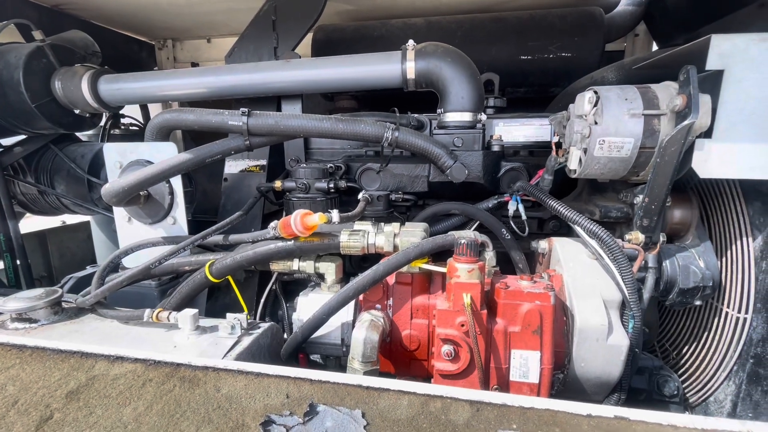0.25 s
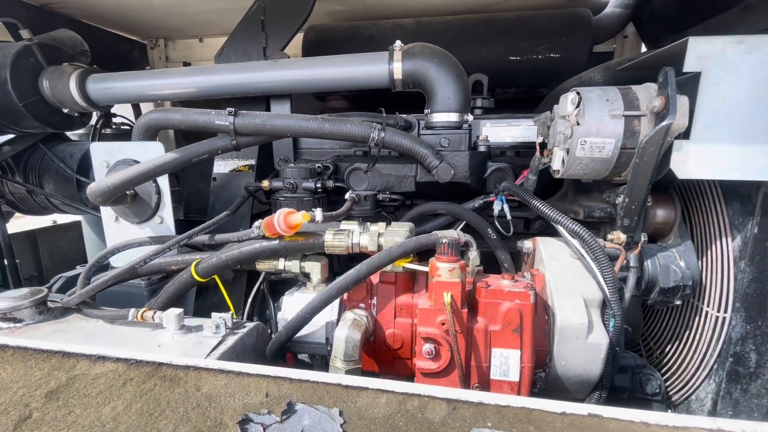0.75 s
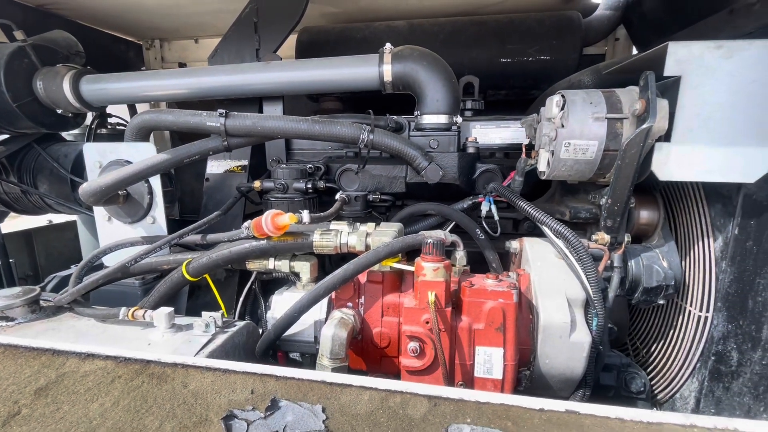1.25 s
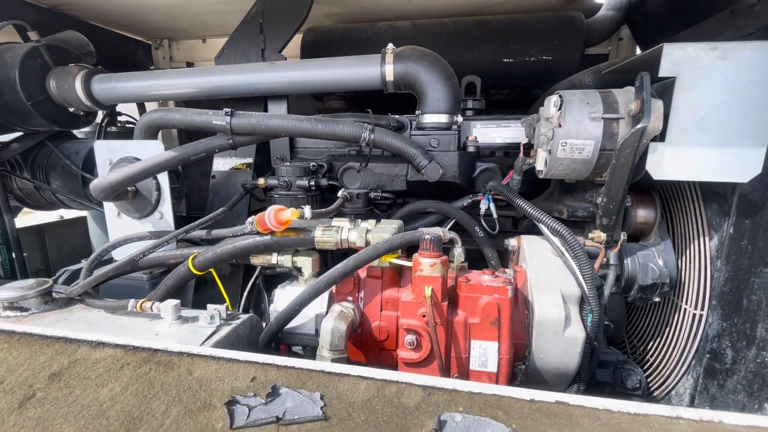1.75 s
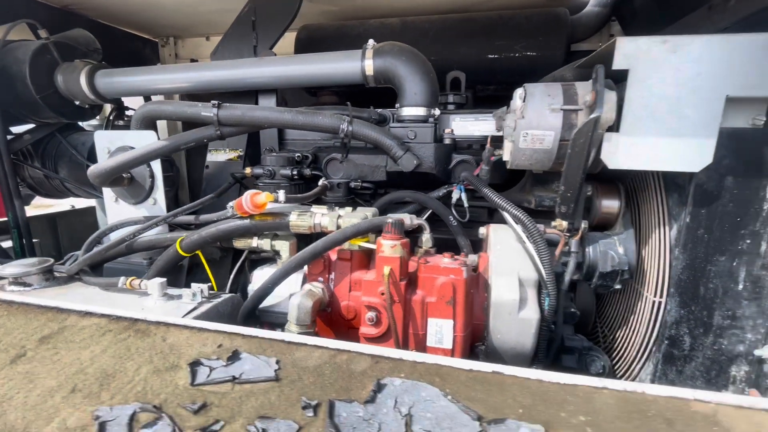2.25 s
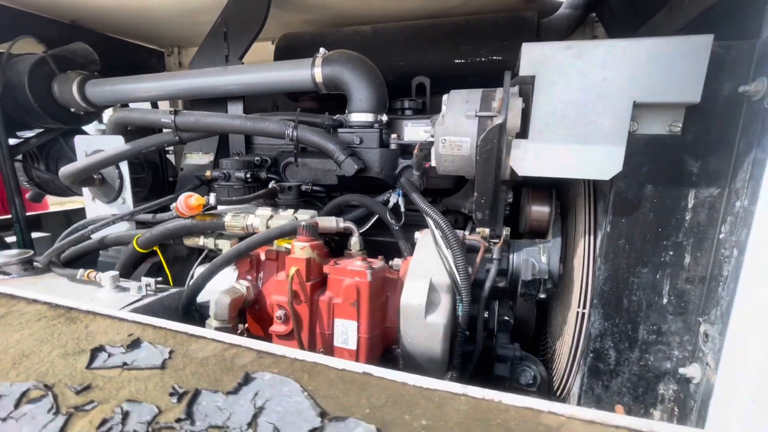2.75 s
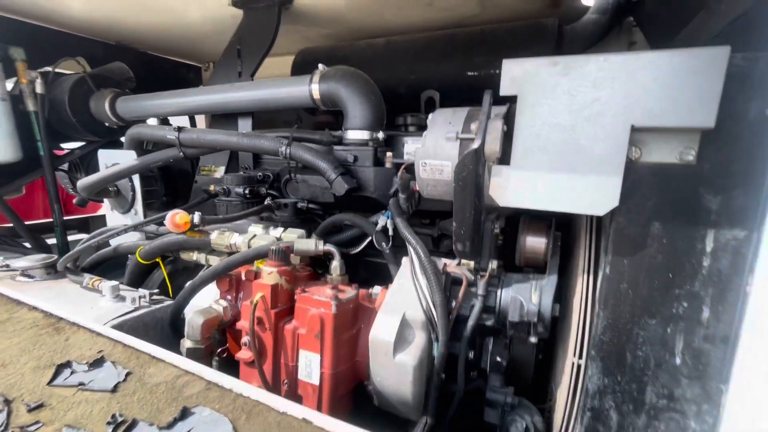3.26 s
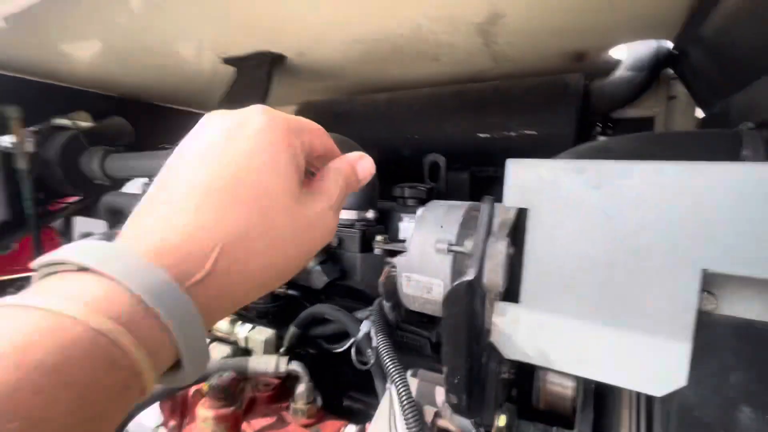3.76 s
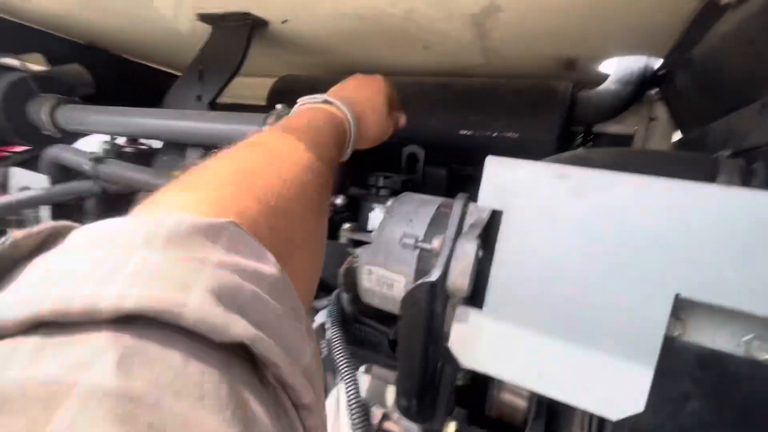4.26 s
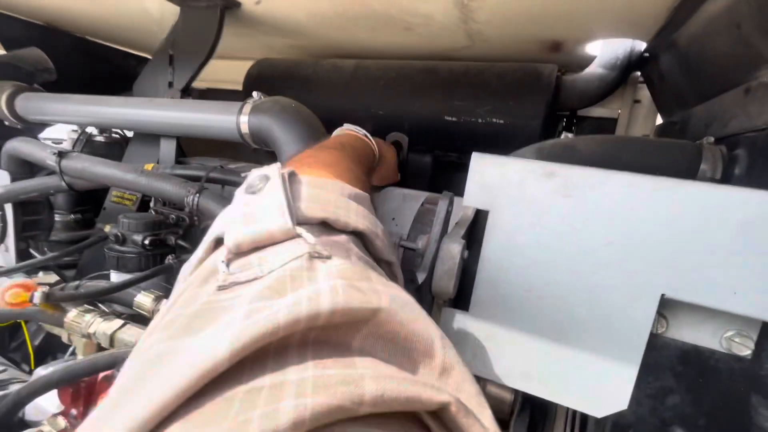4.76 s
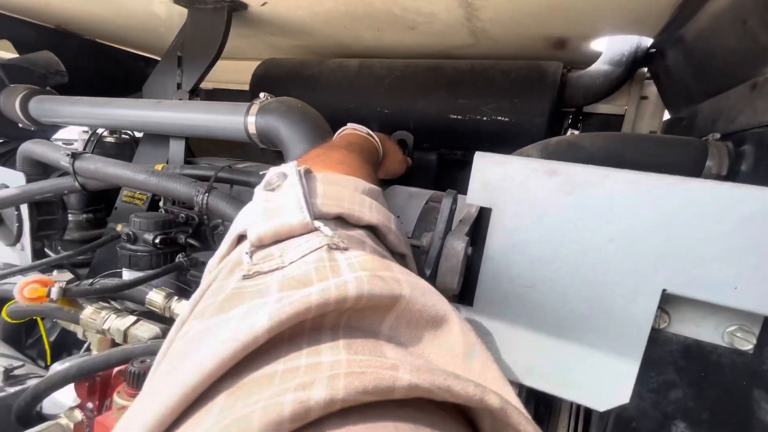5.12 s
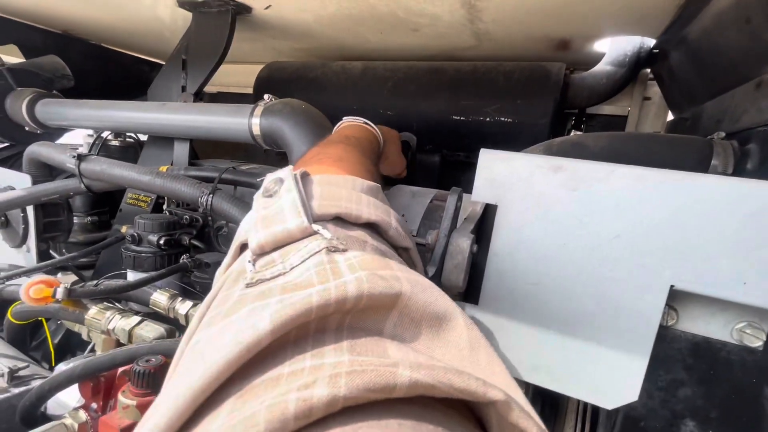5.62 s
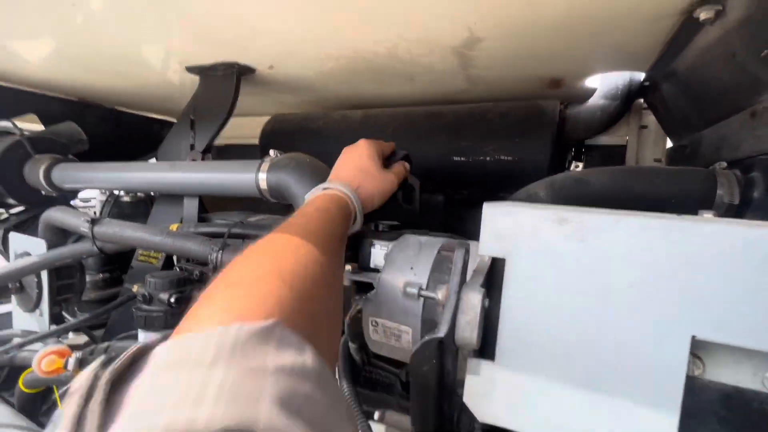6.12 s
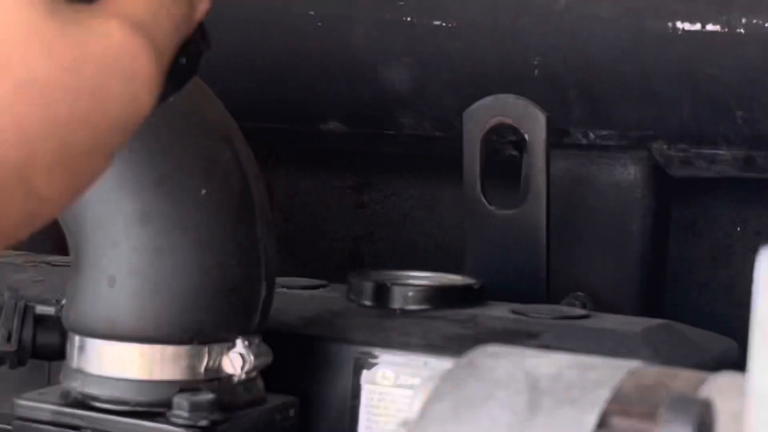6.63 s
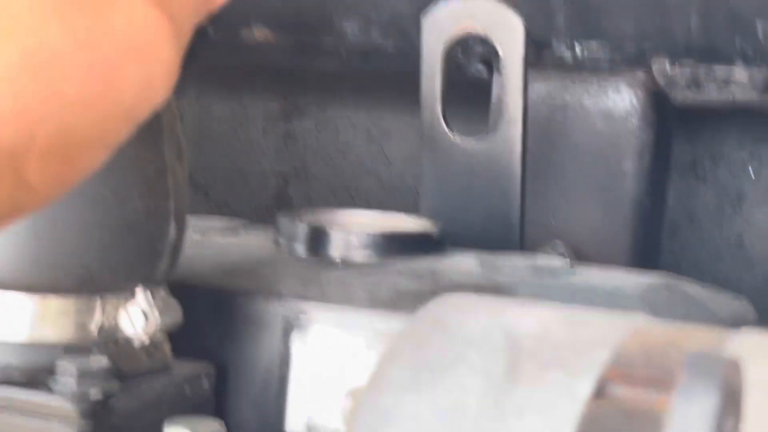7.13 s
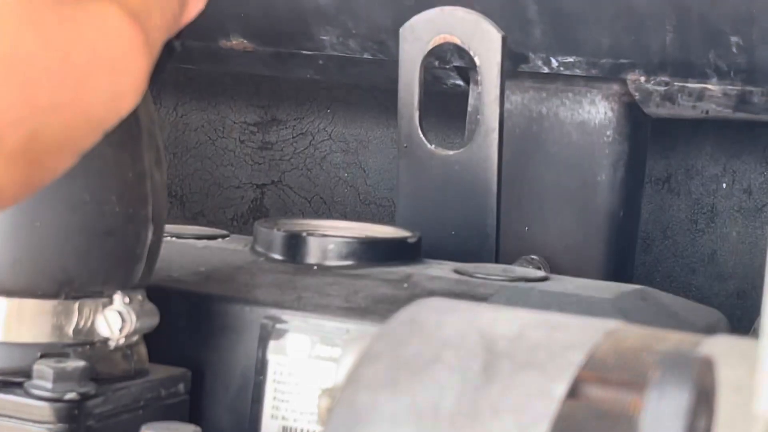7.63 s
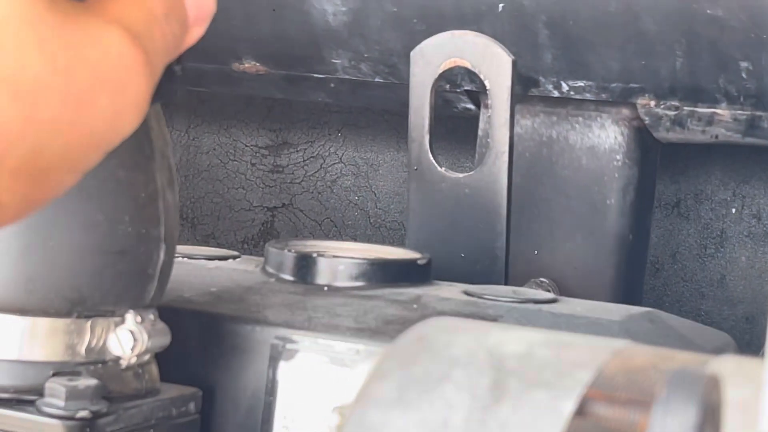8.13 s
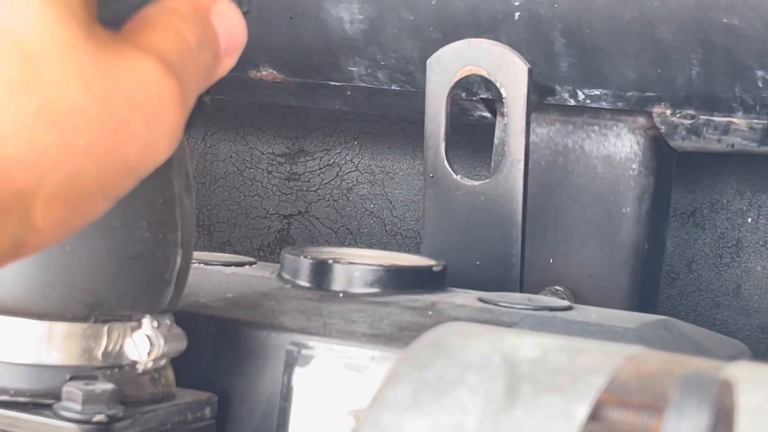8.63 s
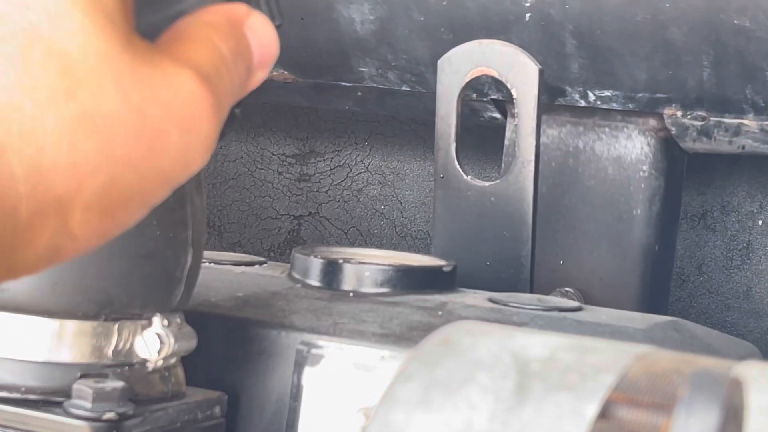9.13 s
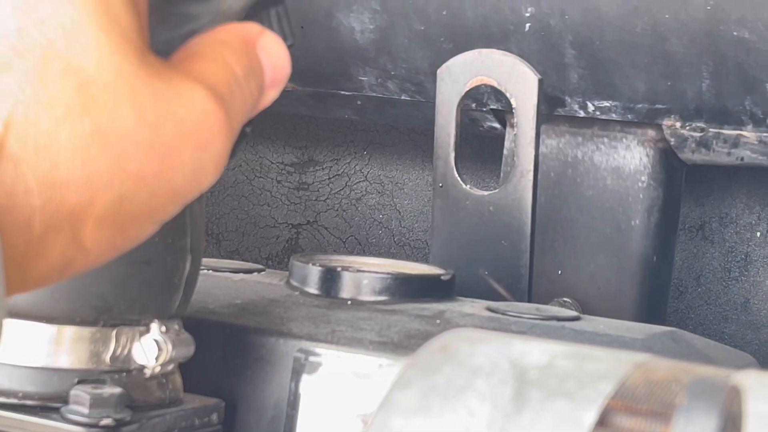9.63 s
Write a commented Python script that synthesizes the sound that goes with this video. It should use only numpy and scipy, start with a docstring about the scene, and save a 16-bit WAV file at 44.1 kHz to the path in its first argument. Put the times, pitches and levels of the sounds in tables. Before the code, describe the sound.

A four-cylinder diesel engine catches right at the start with uneven exhaust thumps and rises quickly in pitch, while panels hum and shudder briefly. The starter adds a metallic rasp from about 0.4 to 1.1 seconds, and covers clank rhythmically as the revs peak near 1.5 seconds. Around 2 seconds the engine sags and gets quieter, then recovers to a steady idle by 4 seconds: a low exhaust drone, hard knocking, fast ticking and an even fan rush. From 3 seconds the microphone leans into the open engine bay and the clatter grows nearer. Between about 4.5 and 6 seconds the metallic ringing shifts slightly upward in colour. At about 6.5 seconds the stereo image narrows, and from 7 seconds the microphone is close over the valves tapping their thin cover. The idle continues evenly to the end, near 10 seconds.

```python
"""A four-cylinder diesel in the open bay of a machine catches with uneven thumps and runs up.
Firing drones in the exhaust and knocks on the block, the injection pump ticks, and panels shudder.
The starter rasps briefly and covers clank; near 2 s the engine sags, then settles to idle.
From 3 s the microphone leans in, and an arm reaching across the bay shifts the ringing for a while.
By 7 s the stereo image has narrowed and the microphone is close over the valves tapping their cover."""
import sys
import numpy as np
from scipy import signal
from scipy.fft import rfft, irfft
from scipy.io import wavfile
from scipy.ndimage import uniform_filter1d

SR = 44100
rng = np.random.default_rng(int(sys.argv[2]) if len(sys.argv) > 2 else 0)


def waveform_to_disk(signal):
    """Save audio, clipped to [-1, 1], as 16-bit WAV at the path in sys.argv[1]."""
    frames = np.transpose(np.atleast_2d(signal))
    scaled = np.clip(frames, -1, 1) * 32767
    samples = np.round(scaled).astype(np.int16)
    wavfile.write(sys.argv[1], SR, samples)


N = 435708
TIME = np.arange(N) / SR
CYLINDERS = 4  # each fires once a cycle
NARROWS_AT_S = 6.55  # the stereo image turns from wide to narrow

# engine speed through run-up, fast idle, sag and recovery (time [s], speed [firings per s])
ENGINE_SPEED = [(0.0, 23.43), (0.1, 29.87), (0.4, 41.55), (0.65, 46.82), (1.0, 51.6), (1.35, 54.81),
                (1.93, 54.05), (2.13, 47.19), (2.45, 45.89), (3.3, 48.7), (4.0, 49.33), (5.3, 49.56),
                (7.0, 49.33), (9.7, 49.82)]
# fuel is full for the run-up, eases, then is cut back (time [s], load [0 idle, 1 full])
ENGINE_LOAD = [(0.0, 0.96), (0.9, 0.85), (1.3, 0.75), (1.62, 0.42), (1.89, 0.34), (1.95, -0.13),
               (2.2, 0.016), (2.7, -0.12)]
# where the microphone is (time [s], place [0 back, 1 leaning in, 2 close])
MIC_PLACE = [(2.95, 0.048), (4.3, 0.93), (6.05, 0.98), (6.3, 1.3), (6.52, 0.92), (6.6, 1.68), (6.95, 2)]
# an arm reaches across the bay and is drawn aside (time [s], how far in the way [0-1])
ARM_IN_WAY = [(4.25, 0.1), (4.55, 0.9), (6.05, 1), (6.3, 0)]


def amp(db):
    """Decibels to gain."""
    return 10 ** (np.asarray(db) / 20)


def evened(x):
    """Scales a signal to an average (rms) level of 1."""
    return x / np.sqrt(np.mean(x ** 2) + 1e-20)


def curves(rows, t):
    """Every column of a time table at the times t."""
    times, *columns = np.transpose(rows)
    return [np.interp(t, times, c) for c in columns]


def spectra(rows, hz):
    """Every column of a frequency table at hz, each as a column vector."""
    freqs, *columns = np.transpose(rows)
    return [np.interp(np.log(hz + 1), np.log(freqs), c)[:, None] for c in columns]


def at_place(levels, t):
    """Blends three levels (back, leaning in, close) as the microphone moves."""
    return np.interp(curves(MIC_PLACE, t)[0], np.arange(len(levels)), levels)


def octaves_over_idle(t):
    """Engine speed in doublings above idle."""
    return np.log2(curves(ENGINE_SPEED, t)[0] / ENGINE_SPEED[-1][1])


def lifted(modes, hz):
    """Lift in dB that a set of resonances gives at hz."""
    return sum(db / (1 + (2 * (hz - centre) / width) ** 2) for centre, width, db in modes)


def waver(hz):
    """A slow random wobble, up to the rate hz."""
    noise = rfft(rng.standard_normal(N))
    return evened(irfft(noise / (1 + (np.fft.rfftfreq(N, 1 / SR) / hz) ** 4), N))


def frames(x):
    """Cuts sound into short spectra: returns frequencies, times and the spectra."""
    return signal.stft(x, SR, nperseg=1024, noverlap=768, scaling="psd")


def unframed(z):
    """Joins short spectra back into sound."""
    return signal.istft(z, SR, nperseg=1024, noverlap=768, scaling="psd")[1][:, :N]


def whitened(x):
    """Short spectra of x, made equally strong on average at every frequency."""
    z = frames(x)[2]
    return z / np.sqrt(2 * np.mean(abs(z) ** 2, axis=-1, keepdims=True) + 1e-20)


def blows(crank, moment, cylinder, db, jitter_s, spread_db):
    """One slightly uneven click each time the cycle comes round to this moment of this cylinder."""
    turns = np.arange(cylinder + moment % 1, crank[-1], CYLINDERS)
    late, size = rng.standard_normal((160, 2))[:len(turns)].T  # enough for 160 cycles
    times = np.interp(turns, crank, TIME) + jitter_s * late
    samples = np.clip(np.round(times * SR), 0, N - 1).astype(int)
    return np.bincount(samples, amp(db + spread_db * size), N)


def rung(clicks, modes, grit, burst_s, lead_s=0):
    """Each blow is a click and a brief rattle; both ring the resonances, lead_s earlier on the left."""
    t = np.maximum(np.arange(4096) / SR - np.array([[0], [lead_s]]), 0)
    ring = sum(amp(db - 60 * t / t60) * np.sin(2 * np.pi * hz * t) for hz, db, t60 in modes)
    decay = np.exp(-2 / (burst_s * SR))
    bursts = np.sqrt(signal.lfilter([1 - decay], [1, -decay], clicks ** 2))
    rattle = bursts * rng.standard_normal((2, N))
    return evened(signal.oaconvolve(clicks + grit * rattle, ring, axes=1)[:, :N])


def thumps(crank, level_db=-25, ease_s=0.72, fade_db_per_s=22):
    """As the engine catches, each firing thumps the exhaust; the thumps fade once it runs freely."""
    # the thump of each cylinder (level [dB])
    cylinder_db = [0.42, -1.5, 0.88, -0.4]
    # exhaust resonances (pitch [Hz], level [dB], time to fade 60 dB [s])
    thump_modes = [(169, -4, 0.023), (254, 0, 0.066), (343, -14, 0.1)]
    clicks = sum(blows(crank, .11, cylinder, db, jitter_s=.00016, spread_db=1.5)
                 for cylinder, db in enumerate(cylinder_db))
    growl = rung(clicks, thump_modes, grit=.5, burst_s=.003)[0]
    growl = signal.sosfilt(signal.butter(2, 130, "high", fs=SR, output="sos"), growl)
    return growl * amp(level_db - fade_db_per_s * np.maximum(TIME - ease_s, 0))


def drone(crank, lag_firings=0.739, low_hz=41.7, low_slope=11):
    """Exhaust and fan tones follow the crankshaft, louder under load and on a resonance."""
    # the tones (pitch [times the firing rate]); 5.353 is the fan, whose overtones beat with the engine's
    orders = [1, 2, 3, 4, 5, 5.353, 10.706, 16, 16.059]
    # their levels (back [dB], leaning in [dB], close [dB], added at full load [dB], speed [dB/octave])
    tone_levels = [(-29.5, -22.5, -21.4, 9.5, -8), (-35.5, -35.5, -40, 12, -1),
                   (-47.5, -41.5, -32, 14.5, 5), (-37, -30, -29.5, 3.5, 7), (-47.5, -40.5, -44, 3.5, 3),
                   (-37.5, -42, -39.5, 9, 12), (-60, -43, -46, 9, 6), (-54, -49.5, -48, 6, 2),
                   (-62, -48, -49, 5, 0)]
    # resonances of exhaust and bay (pitch [Hz], width [Hz], lift [dB])
    exhaust_modes = [(68.4, 16.2, 11), (159, 14, 5), (177.8, 28, -5.5), (200.9, 37, 11), (233.5, 24, 8),
                     (264.4, 39, 6.5), (299, 30, -11)]
    speed, load = curves(ENGINE_SPEED, TIME)[0], curves(ENGINE_LOAD, TIME)[0]
    out = 0
    for order, (*levels, load_db, speed_db) in zip(orders, tone_levels):
        hz = order * speed
        db = at_place(levels, TIME) + load_db * load + speed_db * octaves_over_idle(TIME)
        db += lifted(exhaust_modes, hz)
        db -= 10 * np.log10(1 + (low_hz / hz) ** (2 * low_slope))  # the pipe gives off little deep bass
        db += 0.5 * np.sqrt(amp(-20 - db)) * waver(hz=3.7)  # weak tones waver most
        out -= np.sqrt(2) * amp(db) * np.cos(2 * np.pi * order * (crank - lag_firings))
    left_db = np.where(TIME < NARROWS_AT_S, 1.03, 0.27)
    return out * amp([left_db, -left_db])


def combustion(crank, place_db=(-35, -37, -42), load_db=4, early_firings_per_octave=1.3, left_db=2.7):
    """Every firing knocks on the block: harder under load, and earlier at high speed."""
    # knocks in one cycle (moment [firings], level [dB])
    firing_knocks = [(.1, 1), (1.02, -2.5), (1.93, -1.5), (2.92, 1.5), (3.35, -0.5)]
    # block resonances (pitch [Hz], level [dB], time to fade 60 dB [s])
    block_modes = [(584, -10, 0.075), (731, -9.5, 0.078), (1025, -9, .025), (1153, -1.5, 0.027),
                   (1286, -1, .02), (1470, -6, 0.022), (1670, -2, 0.022), (2570, -6, 0.03)]
    timing = crank + early_firings_per_octave * np.maximum(octaves_over_idle(TIME), 0)
    clicks = sum(blows(timing, moment, int(moment), db, jitter_s=.00025, spread_db=0.82)
                 for moment, db in firing_knocks)
    ring = rung(clicks, block_modes, grit=1.24, burst_s=.0031, lead_s=.0003)
    db = at_place(place_db, TIME) + load_db * curves(ENGINE_LOAD, TIME)[0]
    return ring * amp(db) * amp([[left_db], [-left_db]])


def knock(crank, fade_s=0.051, alike=0.4):
    """Each blow rings the block in its own way, partly alike for all cylinders, heard by two paths."""
    # blows between firings (moment [share of the gap], level for each of the four cylinders [dB])
    block_blows = [(.05, 0, -1.5, -1, -3), (0.251, -2, -3.5, -3, 0.5), (.46, 0, -1.5, -2.5, 2.5),
                   (.66, -3.5, -0.5, -0.5, -4.5), (.86, -7, -2, 2, -0.5)]
    t = np.arange(2048) / SR
    fade = amp(-60 * t / fade_s)
    out = np.zeros((2, N + len(t)))
    for moment, *levels in block_blows:
        shared = rng.standard_normal((2, len(t)))
        for cylinder, db in enumerate(levels):
            own = rng.standard_normal(shared.shape)
            spectrum = rfft(fade * (np.sqrt(alike) * shared + np.sqrt(1 - alike) * own))
            # every blow is equally broad in colour
            ring = irfft(spectrum / np.sqrt(uniform_filter1d(abs(spectrum) ** 2, size=15)))
            clicks = blows(crank, moment, cylinder, db, jitter_s=.00003, spread_db=0.57)
            for at in np.flatnonzero(clicks):
                out[:, at:at + len(t)] += clicks[at] * ring
    return out[:, :N]


def uneven_pull(crank, t, depth_db=1.0, dip_at_cycle=0.84):
    """Under load the cylinders pull unevenly, so the knock dips and swells once a cycle."""
    cycles = np.interp(t, TIME, crank) / CYLINDERS
    strain = np.clip(2 * curves(ENGINE_LOAD, t)[0], 0, 1)
    return amp(-depth_db * strain * np.cos(2 * np.pi * (cycles - dip_at_cycle)))


def ticking_hiss(crank, decay_s=0.0052, fan_power=1.2):
    """Injector and valve ticks are short bursts of noise over the even rush of the fan."""
    # ticks between firings (moment [share of the gap], level for each of the four cylinders [dB])
    ticks = [(0.25, 4.5, 4.9, 7, -8), (.47, -2.5, 5.2, 0, 2.5), (0.8, -0.5, 2.5, -9, -4)]
    power = sum(blows(crank, moment, cylinder, db, jitter_s=.000097, spread_db=1.5) ** 2
                for moment, *levels in ticks for cylinder, db in enumerate(levels))
    power = signal.lfilter([1], [1, -np.exp(-1 / (decay_s * SR))], power)
    return np.sqrt(power / power.mean() + fan_power) * rng.standard_normal((2, N))


def singing(crank, level_db=-0.55, sway_rad=0.25, throb_depth=0.45):
    """The block and its covers sing on overtones of the firing; each sways, and throbs once a cycle."""
    # tones before colouring (rough pitch [times the firing rate], back [dB], leaning in [dB], close [dB])
    overtones = [(4.5, 12, 12, 13.6), (6, 12, 6.84, 10), (7, 9, 16, 7.6), (10, 12, 12.5, 11.7),
                 (11.5, 2, 10, 8.3), (12, 16, 11, 7.2), (13, 15, 5.9, 8), (15, 7, 12, 16),
                 (18.1, 15.5, 4, 5), (19, -2, 6, 11), (20.08, 1, 11, 12.96), (20.25, 0, 14, 14),
                 (20.9, 11, 2, 4), (22.07, 13, 6, 18.6), (23.96, 11, 11, 18.7), (25, -3, 18, 9.5),
                 (25.96, 6, 10, 17), (27.15, 15, 22, 14), (27.9, 2, 9, 25), (30.3, 2, 15, 12),
                 (32, 9, 17, 15), (32.76, 2, 9.7, 24), (34.94, 20, 14, 16.7), (35.9, 4, 6, 16),
                 (37.7, -2, 8, 15.5), (41.8, 8, 14, 15), (51.9, 17, 9.7, 23)]
    db = level_db + np.interp(TIME, [0, .7], [-10, 0])  # the first firings are too ragged to sing
    out = np.zeros((2, N))
    for multiple, *levels in overtones:
        order = round(multiple * CYLINDERS) / CYLINDERS  # locked to the engine's cycle
        sway = np.interp(TIME, np.linspace(0, TIME[-1], 200), rng.standard_normal(200))
        throb = 1 + throb_depth * np.cos(2 * np.pi * (crank / CYLINDERS + rng.random()))
        phase = 2 * np.pi * (order * crank + rng.random()) + sway_rad * sway
        out += amp(at_place(levels, TIME)) * throb * np.array([np.cos(phase), np.sin(phase)])
    return np.sqrt(2) * amp(db) * out


def effort(hz, t):
    """Gain of the clatter: it follows nearness, load and speed, and changes briefly at each jolt."""
    # four noise bands: rumble, knock, ring of the covers, hiss
    # (pitch [Hz], back [dB], leaning in [dB], close [dB], added at full load [dB], speed [dB/octave])
    bands = [(533, -5.5, 1, -0.8, 10, -2), (1130, -6, 0.5, 0, 7, 1.5), (2720, -6, 0, 2, 8, 5),
             (4530, -7.5, 0.5, 1.64, 10, -0.5)]
    # jolts as the engine catches and sags, and a longer shift from rumble towards the treble near 3.6 s (time
    # [s], length [s], rumble [dB], knock [dB], ring [dB], hiss [dB])
    jolts = [(0.042, 0.076, 3, 6, 8.5, 5), (0.29, 0.27, 2.5, -1, -0.5, -1), (2.212, .06, -2, 1, -0.5, -1),
             (3.6, 1.1, -2.5, -0.2, 1, 1.5)]
    load, octaves = curves(ENGINE_LOAD, t)[0], octaves_over_idle(t)
    band_db = np.array([at_place(levels, t) + load_db * load + speed_db * octaves
                        for _, *levels, load_db, speed_db in bands])
    band_db += sum(np.outer(db, np.exp(-(2 * (t - at) / length) ** 2)) for at, length, *db in jolts)
    shares = spectra(np.c_[[row[0] for row in bands], np.eye(len(bands))], hz)  # bands overlap smoothly
    return amp(sum(share * db for share, db in zip(shares, band_db)))


def colour(hz, t):
    """Gain of the clatter by frequency: block and panels sound different from each microphone place."""
    # overall spectrum from each place (pitch [Hz], level [dB per Hz])
    back = [(30, -52), (70, -55), (130, -51), (260, -48.5), (400, -55.5), (750, -56), (1300, -54.5),
            (2000, -58.5), (2700, -60.5), (3700, -67), (6000, -70.5), (8000, -68.5), (11000, -66.5),
            (13000, -87)]
    leaning = [(30, -46), (70, -60), (130, -53.5), (260, -51.5), (400, -57), (750, -55.5), (1300, -56.5),
               (2000, -62), (2700, -64.5), (3700, -70.5), (6000, -70.5), (8000, -70.5), (11000, -68),
               (13000, -85)]
    close = [(30, -60), (70, -52), (130, -51.5), (260, -48.5), (400, -55.5), (750, -57), (1300, -57),
             (2000, -63.5), (2700, -65), (3700, -70.5), (6000, -71), (8000, -69.5), (11000, -64.5),
             (13000, -86.5)]
    # block and panel resonances from each place (pitch [Hz], width [Hz], lift [dB])
    back_modes = [(367, 36, -2.5), (568, 40, 7.5), (750, 49, 8.5), (886, 77, -1.5), (994, 54, 8),
                  (1170, 180, 6.5), (1480, 77, 4.5), (1650, 110, -8), (2530, 85, 5), (5760, 1070, 5.5),
                  (6830, 130, 5), (10450, 610, 7)]
    leaning_modes = [(504, 110, 0.5), (1170, 150, 4.5), (1320, 90, 3), (2500, 250, 5), (5200, 480, 3.5),
                     (5710, 210, 6.5), (8360, 88, 0)]
    close_modes = [(1240, 77, 3.1), (1870, 260, 3.3), (2120, 41, 3), (2510, 220, 5.2), (3060, 380, 3.7),
                   (7150, 100, 2.5), (8200, 430, 4.5)]
    # thin covers and fuel lines, heard from every place (pitch [Hz], width [Hz], lift [dB])
    panel_modes = [(2650, 91, 2), (2880, 63, 4), (3230, 52, 5), (4500, 80, 3.5), (4860, 33, 8),
                   (5110, 53, 8), (5740, 91, 4.5), (6110, 64, 8), (6970, 100, 6), (8510, 63, 8)]
    place, power = curves(MIC_PLACE, t)[0], 0
    views = [(back, back_modes), (leaning, leaning_modes), (close, close_modes)]
    for k, (body, modes) in enumerate(views):
        db = spectra(body, hz)[0] + lifted(modes + panel_modes, hz)[:, None]
        power += amp(db) ** 2 * np.maximum(0, 1 - abs(place - k))
    return np.sqrt(power)


def ripple(hz, t, depth_db=2.5):
    """Sound paths in the bay interfere, making narrow random peaks that drift in the treble."""
    smoothing = np.outer(np.ones(2), np.hanning(601))  # narrow in pitch, long in time
    field = evened(signal.oaconvolve(rng.standard_normal((len(hz), len(t))), smoothing, "same"))
    return amp(depth_db * field * spectra([(1200, 0), (2500, 1)], hz)[0])


def microphone_ports(z, hz, t, lead_s=.00048):
    """Mixes two unrelated sounds into left and right; the left leads while the image is wide."""
    # wide image (pitch [Hz], likeness in the open [0-1], beside the arm [0-1], left over right [dB])
    wide_image = [(150, 0.98, 0.95, -1.5), (300, 0.7, 0.72, -1.5), (573, 0.22, 0.19, 4.5),
                  (1170, 0.18, 0.87, 3.5), (1660, 0, 0.14, 1.5), (2520, 0.12, 0.11, 2),
                  (4500, 0.06, 0.3, 5), (6500, 0, 0.13, 10.5), (8540, 0, 0.086, 1.5), (8830, 0.87, 0.22, 2),
                  (9350, 1, .995, -1)]
    # narrow image (pitch [Hz], likeness [0-1], left over right [dB])
    narrow_image = [(202, 0.94, -1), (600, 0.89, 3), (1100, 0.78, 4.5), (1500, 0.65, 2.5), (2230, .999, -1),
                    (3140, 0.98, 0), (3800, 1, -1)]
    wide, arm = t < NARROWS_AT_S, curves(ARM_IN_WAY, t)[0]
    in_open, by_arm, wide_db = spectra(wide_image, hz)
    narrow, narrow_db = spectra(narrow_image, hz)
    likeness = np.clip(np.where(wide, in_open + (by_arm - in_open) * arm, narrow), 0, 1)
    tilt = amp(np.where(wide, wide_db, narrow_db))
    delayed_band = spectra([(300, 0), (650, 1)], hz)[0] * (hz < 8400)[:, None]
    lag = 2 * np.pi * hz[:, None] * lead_s * delayed_band * wide
    lag -= 0.076 * np.sin(2 * lag)  # bands tend to lie either in step or opposed
    right = likeness * np.exp(-1j * lag) * z[0] + np.sqrt(1 - likeness ** 2) * z[1]
    return np.array([tilt * z[0], right]) * np.sqrt(2 / (1 + tilt ** 2))


def clatter(crank, knock_db=-0.97, low_hz=48, boom_hz=69, boom_db=-4):
    """Ringing blows and the singing block fill the middle pitches, ticking hiss the top."""
    # how much of the noise is ringing rather than hiss (pitch [Hz], share [0-1])
    ringing_share = [(110, 0.18), (250, 0.64), (700, 0.61), (1400, 0.74), (2600, 0.6), (4000, 0.41),
                     (6000, 0.086)]
    hz, t, _ = frames(TIME)
    share = spectra(ringing_share, hz)[0]
    high = spectra([(4000, 0), (8000, 1)], hz)[0]
    dull_ticks = np.sqrt(1 - high) * whitened(ticking_hiss(crank))
    bright_ticks = np.sqrt(high) * whitened(ticking_hiss(crank))
    knocks = amp(knock_db) * whitened(knock(crank)) * uneven_pull(crank, t)
    noise = np.sqrt(share) * knocks + np.sqrt(1 - share) * (dull_ticks + bright_ticks)
    source = noise * ripple(hz, t) + frames(singing(crank))[2]
    gain = effort(hz, t) * colour(hz, t) * starter_rasp(hz, t) * reaching_arm(hz, t)
    x = unframed(microphone_ports(source * gain, hz, t))
    boom = signal.lfilter(*signal.iirpeak(boom_hz, Q=2.1, fs=SR), x)  # the air in the bay booms
    return signal.sosfilt(signal.butter(3, low_hz, "high", fs=SR, output="sos"), x + amp(boom_db) * boom)


def shudders():
    """Panels hum briefly as the engine speed sweeps through their resonances."""
    # hums (time [s], length [s], pitch [Hz], level [dB])
    hums = [(.245, 0.14, 346, -22.5), (0.296, 0.067, 559, -23), (.505, .08, 239, -14.5),
            (0.755, 0.092, 343, -26.5), (2.216, 0.052, 250, -25)]
    out = 0
    for at, length, hz, db in hums:
        swell = np.exp(-(2 * (TIME - at) / length) ** 2)
        out += np.sqrt(2) * amp(db) * swell * np.sin(2 * np.pi * hz * (TIME - at))
    return out


def starter_rasp(hz, t, edge_s=.04):
    """Gain that adds a metallic rasp while the engine outruns the starter's still engaged gear."""
    # when it rasps (start [s], end [s])
    span = (0.44, 1.12)
    # starter resonances (pitch [Hz], width [Hz], lift [dB])
    starter_modes = [(5530, 430, 2.5), (6200, 300, 4), (7070, 220, 6), (9300, 1100, 5)]
    engaged = np.clip(np.minimum(t - span[0], span[1] - t) / edge_s + .5, 0, 1)
    return amp(np.outer(lifted(starter_modes, hz), engaged))


def clanks(crank, load_db=10, in_bay_db=-11, rise_s=0.0013, fade_in_firings_per_s=2.9):
    """At high revs the same covers clank at the same moments of every cycle, hardest under load."""
    # (moment [firings], pitch [Hz], rattle [gain], level [dB], decay [s],
    #  starts above [firings per s], left side's lead [s]) for each cover
    covers = [(.6, 1460, 0.4, -12, .012, 46, 0.00043), (3.2, 2590, 0.4, -13, .0055, 49, 0.00045),
              (2.38, 930, 0.6, -20, .005, 44, 0.0003), (1.68, 1200, .7, -20, 0.005, 43, 0.00028),
              (2.7, 1400, .7, -19, 0.005, 44, 0.00028), (3.25, 950, 0.68, -20, .006, 44, .00026),
              (3.68, 1280, 0.6, -16.5, 0.0045, 46, 0.0003)]
    speed, load = curves(ENGINE_SPEED, TIME)[0], curves(ENGINE_LOAD, TIME)[0]
    t, out = np.arange(4096) / SR, 0
    for moment, hz, grit, db, decay_s, start_speed, lead_s in covers:
        clicks = blows(crank, moment, int(moment), db, jitter_s=.00003, spread_db=1.44)
        clicks = clicks * np.clip((speed - start_speed) / fade_in_firings_per_s, 0, 1)
        swell = (1 - np.exp(-t / rise_s)) * np.exp(-t / decay_s)
        swell /= swell.max()
        tone = swell * np.sin(2 * np.pi * hz * np.array([t, t - lead_s]))
        ring = signal.oaconvolve(clicks[None], tone, axes=1)[:, :N]
        noise = evened(signal.lfilter(*signal.iirpeak(hz, Q=6, fs=SR), rng.standard_normal((2, N))))
        rattle = noise * signal.oaconvolve(clicks, swell)[:N]
        out += (ring + grit * rattle) / np.sqrt(1 + 2 * grit ** 2)
    return out * amp(load_db * (load - 1.08) + at_place([0, in_bay_db, in_bay_db], TIME))


def valve_taps(crank, place_db=(-70, -48, -31), stereo_width=0.21, left_db=1):
    """The valves ring their thin rocker cover, which is heard only from close by."""
    # taps in one cycle (moment [firings], level [dB])
    taps = [(.17, -3.5), (1.05, -3.5), (2.05, 0.5), (2.45, -5.5), (3.07, 0.5)]
    # cover resonances (pitch [Hz], level [dB], time to fade 60 dB [s])
    cover_modes = [(1000, -1, 0.018), (1208, -1.5, .03), (1333, -2, .04), (1651, -3.5, 0.054),
                   (1754, -5, .05), (2590, -3, 0.032), (3120, -12, 0.045), (3300, -16, .04)]
    clicks = sum(blows(crank, moment, int(moment), db, jitter_s=.00004, spread_db=.6)
                 for moment, db in taps)
    left, right = rung(clicks, cover_modes, grit=0.57, burst_s=.0025)
    pair = np.array([left, left + stereo_width * (right - left)]) * amp([[left_db], [-left_db]])
    return pair * amp(at_place(place_db, TIME))


def reaching_arm(hz, t):
    """Gain from an arm across the bay, which shifts the ringing upwards."""
    # its peaks and dips (pitch [Hz], width [Hz], lift [dB])
    arm_modes = [(1110, 115, -5), (1660, 140, 6), (2020, 80, 5), (3300, 350, -3.5)]
    return amp(np.outer(lifted(arm_modes, hz), curves(ARM_IN_WAY, t)[0]))


def scene():
    """Adds up the engine's sounds; crank is how far the crankshaft has turned, counted in firings."""
    crank = np.cumsum(curves(ENGINE_SPEED, TIME)[0]) / SR
    return (drone(crank) + clatter(crank) + clanks(crank) + thumps(crank)
            + combustion(crank) + valve_taps(crank) + shudders())


def record(dry, ceiling=.92, top_hz=13000):
    """Turns the right side's phase once across the high treble, rounds off peaks and cuts the top."""
    turn = np.interp(np.fft.rfftfreq(N, 1 / SR), [8700, 9850, 10350, 11850], [0, .44, .53, 1])
    right = irfft(rfft(dry[1]) * np.exp(-2j * np.pi * turn), N)
    x = np.array([dry[0], right])
    rounded = x / (1 + (x / ceiling) ** 8) ** (1 / 8)
    lowpass = signal.firwin(511, top_hz, window=("kaiser", 9), fs=SR)
    return signal.oaconvolve(rounded, lowpass[None], "same")


dry = scene()
out = record(dry)
waveform_to_disk(out)
```